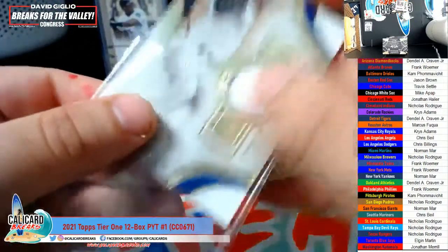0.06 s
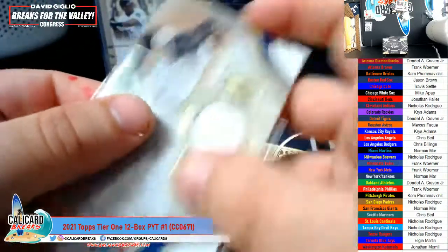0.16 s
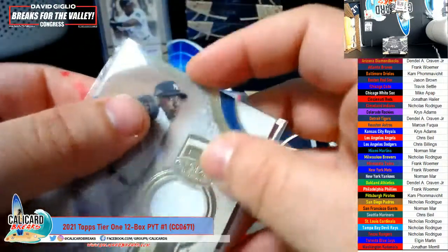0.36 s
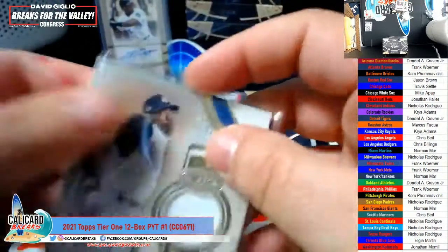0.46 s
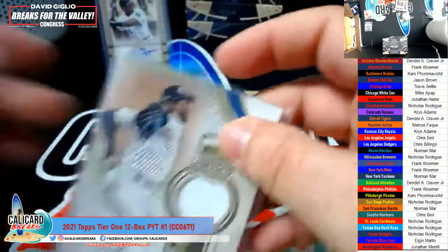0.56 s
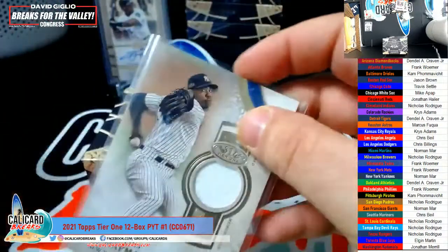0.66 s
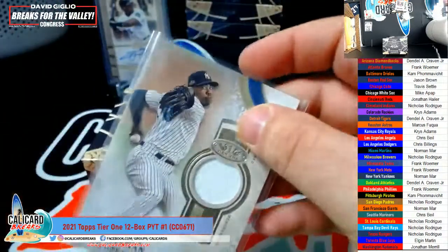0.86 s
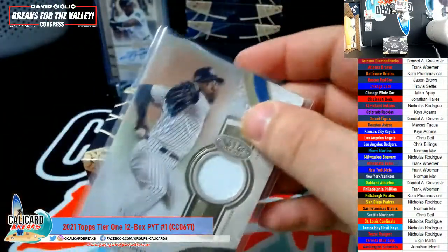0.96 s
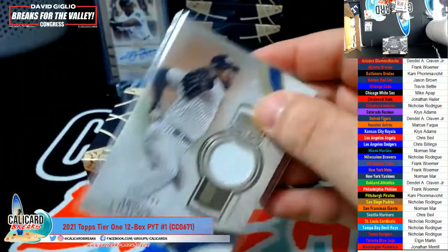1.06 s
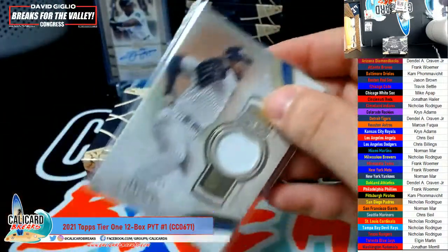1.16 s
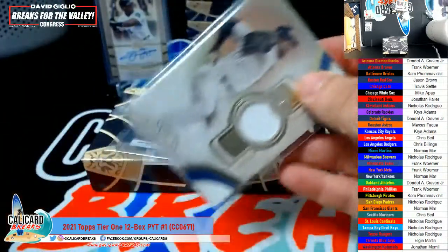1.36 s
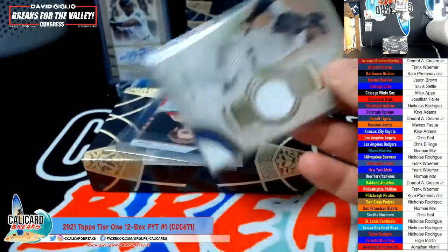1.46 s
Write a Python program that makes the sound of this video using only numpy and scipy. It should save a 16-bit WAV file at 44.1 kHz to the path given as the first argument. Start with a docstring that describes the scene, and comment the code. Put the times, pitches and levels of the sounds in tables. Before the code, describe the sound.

Close to the microphone and slightly left, a card swishes into a plastic sleeve that snaps crisply as it seats. Fingertips then rub, tick and squeak on the plastic, while a soft electrical hum and fan fill the small room.

```python
"""Sleeving a trading card

At a desk in a small room, close to a stereo microphone and a little to its left. A card swishes
along a thin plastic sleeve, and the film buckles with three snaps as the card seats. Fingers then
shift their grip with small ticks, rubs and rubbery squeaks. Mains hum and a fan lie behind it all."""
import sys
import numpy as np
from scipy import signal
from scipy.fft import rfft, irfft
from scipy.io import wavfile

SR = 44100
rng = np.random.default_rng(int(sys.argv[2]) if len(sys.argv) > 2 else 0)


def wav_record(signal):
    """Record a signal, one row per channel, as 16-bit PCM in the file named by sys.argv[1]."""
    frames = np.transpose(np.atleast_2d(signal))
    bounded = np.clip(frames, -1, 1)
    # unit amplitude maps onto the largest positive 16-bit level
    quanta = np.round(bounded * 32767).astype(np.int16)
    wavfile.write(sys.argv[1], SR, quanta)


N = 66150
T = np.arange(N) / SR

# hum lines of mains and fan: pitch_hz, rms_db
HUM_LINES = [(26.9, -61), (59.2, -62.5), (118.6, -64), (294, -75.5), (351.5, -68), (490, -87.5),
             (543, -92.5)]
# brief swells of the hum: peak_s, level_db, half_length_s, pitch_hz, glide_hz_per_s
HUM_SWELLS = [(0.756, -52, 0.023, 359, -5), (1.429, -55, 0.038, 296.7, 412)]
# spectrum of the fan's air noise: frequency_hz, relative_db
FAN_COLOUR = [(20, 0.5), (32, -1.5), (45, -10.5), (90, -2), (150, -12.5), (250, -4.5), (370, -8),
              (480, -18), (800, -23.5), (2000, -28.5), (5000, -38), (6800, -34.5), (10000, -40.5),
              (15500, -49)]
# how alike left and right are, for the room and for the hands: frequency_hz, correlation
ROOM_LIKENESS = [(30, 1), (120, 0.89), (400, .85), (1500, 0.17), (8000, 0.13)]
HAND_LIKENESS = [(400, 0.97), (1200, .6), (4000, .25), (12000, .15)]
# skin rubbing over the sleeve: peak_s, level_db, rise_s, fall_s, centre_hz
RUBS = [(.655, -82, .02, 0.054, 3500), (.864, -58.5, .0085, 0.01, 280), (.957, -56, 0.0092, 0.038, 456),
        (.998, -57, 0.00088, 0.003, 610), (1.156, -64.5, 0.024, 0.036, 227),
        (1.169, -69.5, 0.03, 0.024, 3800), (1.243, -65, 0.008, 0.029, 5500),
        (1.246, -53, 0.0063, 0.0054, 1600), (1.278, -58.5, 0.037, 0.013, 646),
        (1.434, -66.5, 0.027, 0.0088, 790)]
# fingertips scuffing the sleeved card: peak_s, level_db, rise_s, fall_s
SCUFFS = [(0.917, -63.5, 0.017, 0.016), (0.953, -64, 0.0097, 0.014), (1.034, -49.5, 0.0074, 0.017),
          (1.177, -59.5, 0.029, 0.023)]
# resonances of the sleeved card: pitch_hz, relative_db, width_hz
CARD_MODES = [(547, 10.5, 34), (804, 9, 64), (1227, -2, 33), (2040, -41, 130)]
# fingertips slipping: peak_s, level_db, rise_s, fall_s, pitch_hz, overtone_db, jitter_share
SQUEAKS = [(.926, -56.5, .012, .0039, 655, -12, .05), (.957, -58.5, .008, .014, 1250, -20, .02),
           (1.029, -45, .007, .005, 550, -18, .04), (1.0355, -40.5, .0015, .0065, 585, -27, .03),
           (1.1335, -48.5, .0022, .002, 761, -21, .06), (1.174, -50, .0048, .0038, 2480, -16, .05),
           (1.184, -47, .0013, .0025, 2480, -24, .04), (1.2435, -48.5, .0035, .0025, 1100, 7.5, .05),
           (1.2505, -47, .002, .005, 1200, -14, .05), (1.254, -42, .003, .002, 2180, -28, .04),
           (1.259, -51, .0015, .005, 1150, -2, .06), (1.2775, -44, .0026, .005, 350, -6, .15)]
# light ticks of the film: peak_s, level_db, decay_s, centre_hz
TICKS = [(0.509, -60, .004, 8500), (.5146, -57, 0.0045, 8800), (0.5154, -65, 0.0035, 1690),
         (0.52, -70.5, 0.0013, 5000), (.677, -66.5, .0018, 2670), (.924, -58.5, 0.0019, 4830),
         (0.9386, -57.5, 0.0021, 8250), (.997, -78, .002, 4500), (1.034, -69, 0.0066, 3430),
         (1.132, -70.5, .0019, 5900), (1.207, -71.5, 0.018, 4500), (1.241, -63.5, 0.0025, 5940),
         (1.357, -66.5, 0.002, 8000), (1.38, -72.5, .015, 8000), (1.396, -67.5, 0.018, 6700),
         (1.4065, -51.5, 0.0073, 7500), (1.4278, -55, 0.0015, 1570), (1.429, -55.5, 0.011, 7150),
         (1.482, -69, 0.0017, 1570)]
# the card's face sliding on the film: time_s, level_db
SWISH_LEVEL = [(0, -52), (.02, -49.5), (.06, -50), (.088, -52.5), (.125, -50), (.158, -47), (.18, -51.5),
               (.2, -55.5), (.222, -65), (.245, -53), (.278, -69.5), (.295, -54.5), (.32, -54.5),
               (.365, -45.5), (.395, -63.5), (.435, -77), (.47, -90.5)]
# spectrum of that friction: frequency_hz, relative_db
SWISH_COLOUR = [(400, -18.5), (800, -7.5), (1500, -16.5), (2800, -11), (3900, -4), (6500, 2), (9500, 4),
                (12000, -1), (13500, -8), (16000, -25)]
# the card's edge scraping along the seam into the sleeve's end: time_s, level_db
SCRAPE_LEVEL = [(.12, -112), (.19, -63.5), (.225, -89), (.275, -62), (.305, -73), (.335, -59.5),
                (.355, -54.5), (.374, -55), (.405, -59), (.45, -88.5)]
# spectrum of that scrape: frequency_hz, relative_db
SCRAPE_COLOUR = [(400, -27), (750, -5), (1400, 2), (2300, -8), (5000, -4), (12000, -21)]
# snaps of the sleeve, with each later level relative to level_db: start_s, level_db, crack_hz, width_octaves,
# echo_s, echo_db, knock_hz, knock_db, ring_db, flutter_db, top_hz, right_lag_s
SNAPS = [(.23155, -4.3, 7820, .61, .00072, -5.5, 720, -31.5, -17, -14, 17500, .000021),
         (.3077, -24.5, 10300, .55, .00058, 8, 900, -33, -32, -9, 17500, .000018),
         (.3633, -17.5, 5900, 1.15, .00105, .5, 1500, -9.5, -22, -6, 12000, .000068)]

CARD_PAN_DB, FINGER_PAN_DB, SNAP_PAN_DB = 2, 3.2, 4.5  # left over right


def from_db(db):
    """Decibels to gain."""
    return 10 ** (np.asarray(db) / 20)


def level_curve(points):
    """Gain over time through (time_s, level_db) points, closing with a 10 ms fade."""
    s, db = np.transpose(points)
    fade = np.clip((s[-1] - T) * 100, 0, 1)
    return from_db(np.interp(T, s, db)) * fade * (T >= s[0] - .03)


def swell(peak_s, rise_s, fall_s):
    """A rounded rise to the peak, then an exponential fall."""
    t = T - peak_s
    return np.exp(-(np.minimum(t, 0) / rise_s) ** 2 - np.maximum(t, 0) / fall_s)


def at_hz(points, hz):
    """Read a table on a log-frequency axis."""
    frequency, value = np.transpose(points)
    return np.interp(np.log(hz), np.log(frequency), value)


def drift(rate_hz):
    """Smooth random wander, mostly slower than rate_hz; rms 1."""
    pole = np.exp(-2 * np.pi * rate_hz * 20 / SR)  # one step per 20 samples
    slow = signal.lfilter([1], [1, -2 * pole, pole ** 2], rng.standard_normal(N // 20 + 2002))[2000:]
    return np.interp(np.arange(N) / 20, np.arange(len(slow)), unit_rms(slow))


def unit_rms(x):
    """Scale to rms 1."""
    return x / np.sqrt(np.mean(x ** 2) + 1e-20)


def noise(colour, likeness=HAND_LIKENESS, grain_share=.4, grains_per_s=1700):
    """Coloured stereo noise with a share of its power in tiny separate catches; rms 1."""
    hz = np.maximum(np.fft.rfftfreq(N, 1 / SR), 1)
    white = rng.standard_normal((2, N))
    grains = unit_rms(rng.standard_normal((2, N)) * (rng.random(N) < grains_per_s / SR))
    texture = np.sqrt(1 - grain_share) * white + np.sqrt(grain_share) * grains
    mid, side = rfft(texture) * from_db(at_hz(colour, hz))
    alike = at_hz(likeness, hz)
    mid, side = mid * np.sqrt(1 + alike), side * np.sqrt(1 - alike)
    return unit_rms(irfft([mid + side, mid - side], N))


def hump(centre_hz, octaves):
    """A broad resonance with a dull top, as (frequency_hz, relative_db) points."""
    hz = np.geomspace(20, 20000, 90)
    away = np.log2(hz / centre_hz) / octaves
    treble_db = -14 / (1 + (12400 / hz) ** 20)  # shelf above 12.4 kHz
    return np.transpose([hz, treble_db - 20 * np.log10(1 + away ** 2 + (away / 2) ** 4)])


def burst(hz, octaves):
    """An impulse through a heavily damped resonance; peak 1."""
    edges = np.clip(hz * 2 ** (np.array([-.5, .5]) * octaves), 20, .47 * SR)
    band = signal.butter(2, edges, "band", fs=SR, output="sos")
    pulse = signal.sosfilt(band, signal.unit_impulse(1024))
    return pulse / np.abs(pulse).max()


def delay(seconds):
    """The spectrum of a pure delay."""
    return np.exp(-2j * np.pi * np.fft.rfftfreq(N, 1 / SR) * seconds)


def pan(db):
    """Left and right gains, db apart."""
    return from_db(np.array([[db], [-db]]) / 2)


def place(x, pan_db, lag_s):
    """A point source that reaches the right microphone later and softer."""
    return np.array([x, irfft(rfft(x) * delay(lag_s), N)]) * pan(pan_db)


def room(x, wet_db, t60_s=.12, build_s=.002):
    """Add the short diffuse ring of desk and walls."""
    t = T[:N // 4]
    tail = rng.standard_normal((2, len(t))) * from_db(-60 * t / t60_s) * (1 - np.exp(-t / build_s))
    tail /= np.sqrt(np.sum(tail ** 2) / 2)
    return x + from_db(wet_db) * signal.fftconvolve(x, tail, axes=1)[:, :N]


def mains_and_fan(waver_db=2.5, wander_rad=.56, air_db=-61.5):
    """Room tone: wavering hum that swells briefly twice, over the air noise of a fan."""
    hum = np.zeros(N)
    for hz, db in HUM_LINES:
        gain = np.sqrt(2) * from_db(db + waver_db * drift(4.5))
        hum += gain * np.sin(2 * np.pi * (hz * T + rng.random()) + wander_rad * drift(6.8))
    for peak_s, db, half_length_s, hz, glide in HUM_SWELLS:
        t = T - peak_s
        cycles = (hz + glide * t / 2) * t + rng.random()
        hum += from_db(db) * np.exp(-(t / half_length_s) ** 2) * np.sin(2 * np.pi * cycles)
    return hum + from_db(air_db) * noise(FAN_COLOUR, ROOM_LIKENESS, grain_share=0)


def skin_rubs(flutter_db=1):
    """Skin drags over the plastic in uneven catches."""
    rubs = np.zeros((2, N))
    for peak_s, db, rise_s, fall_s, hz in RUBS:
        friction = noise(hump(hz, octaves=.81), grain_share=.65, grains_per_s=620)
        rubs += from_db(db) * swell(peak_s, rise_s, fall_s) * friction
    return rubs * from_db(flutter_db * drift(160))


def card_scuffs(catches_per_s=620):
    """A dense run of skin catches sets the sleeved card's damped modes ringing."""
    catches = rng.standard_normal(N) * (rng.random(N) < catches_per_s / SR)
    body = np.zeros(N)
    for hz, db, width_hz in CARD_MODES:
        radius = np.exp(-np.pi * width_hz / SR)
        poles = [1, -2 * radius * np.cos(2 * np.pi * hz / SR), radius ** 2]
        body += from_db(db) * unit_rms(signal.lfilter([1, 0, -1], poles, catches))
    envelope = sum(from_db(db) * swell(s, rise, fall) for s, db, rise, fall in SCUFFS)
    return unit_rms(body) * envelope


def fingertip_squeaks(flutter_db=1.5):
    """Fingertips stick and slip on the plastic in short, unsteady tones."""
    squeaks = np.zeros(N)
    for peak_s, db, rise_s, fall_s, hz, overtone_db, jitter in SQUEAKS:
        phase = 2 * np.pi * np.cumsum(hz * (1 + jitter * drift(281))) / SR
        tone = np.sin(phase) + from_db(overtone_db) * np.sin(2 * phase)
        squeaks += from_db(db + flutter_db * drift(240)) * swell(peak_s, rise_s, fall_s) * tone
    return squeaks


def fingers():
    """The grip shifts: squeaks and scuffs come from one point, the rubbing spreads wider."""
    squeaks = fingertip_squeaks()
    rubs = skin_rubs() * pan(FINGER_PAN_DB)
    fingertips = place(squeaks + card_scuffs(), FINGER_PAN_DB, lag_s=.00014)
    return room(fingertips + rubs, wet_db=-15)


def film_ticks(attack_s=.00032):
    """Tiny crackles of the film under the fingers."""
    ticks = sum(from_db(db) * swell(peak_s, attack_s, decay_s) * noise(hump(hz, octaves=.71))
                for peak_s, db, decay_s, hz in TICKS)
    return room(ticks * pan(CARD_PAN_DB), wet_db=-18.5)


def card_slide():
    """Fine friction of card on film, with a duller scrape of its edge as it seats."""
    swish = level_curve(SWISH_LEVEL) * noise(SWISH_COLOUR)
    scrape = level_curve(SCRAPE_LEVEL) * noise(SCRAPE_COLOUR)
    return (swish + scrape) * pan(CARD_PAN_DB)


def sleeve_snaps(flutter_s=.001):
    """The film buckles with a bright crack and a knock of the card, echoes off the desk and flutters out."""
    snaps = np.zeros((2, N))
    t = T[:N // 50]
    for (start_s, db, crack_hz, octaves, echo_s, echo_db,
         knock_hz, knock_db, ring_db, flutter_db, top_hz, lag_s) in SNAPS:
        crack = burst(crack_hz, octaves)
        bright_skirt = from_db(-14) * burst(8940, octaves=1.6)
        film_ring = from_db(ring_db) * burst(4270, octaves=.36)
        lowpass = signal.butter(4, top_hz, fs=SR, output="sos")
        film = signal.sosfilt(lowpass, crack + bright_skirt + film_ring)
        echo = 1 + from_db(echo_db) * delay(echo_s)
        knock = from_db(knock_db) * burst(knock_hz, octaves=1.14)
        spectrum = (rfft(film, N) * echo + rfft(knock, N)) * delay(start_s)
        snap = place(from_db(db) * irfft(spectrum, N), SNAP_PAN_DB, lag_s)
        flutter = rng.standard_normal((2, len(t))) * np.sqrt(t) * np.exp(-t / flutter_s)
        flutter *= from_db(flutter_db) / np.sqrt(np.sum(flutter ** 2) / 2)
        snaps += snap + signal.fftconvolve(snap, flutter, axes=1)[:, :N]
    return room(snaps, wet_db=-25)


def scene():
    """Card, sleeve and fingers close to the microphone, room tone behind."""
    return card_slide() + sleeve_snaps() + film_ticks() + fingers() + mains_and_fan()


def record(dry, stop_hz=16900):
    """The highest treble is cut off steeply."""
    return signal.sosfiltfilt(signal.cheby2(14, 45, stop_hz, fs=SR, output="sos"), dry)


dry = scene()
out = record(dry)
wav_record(out)
```